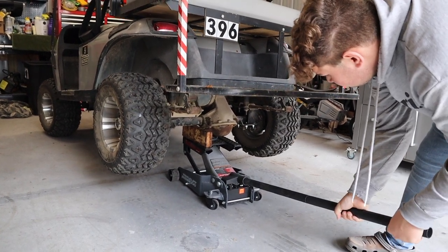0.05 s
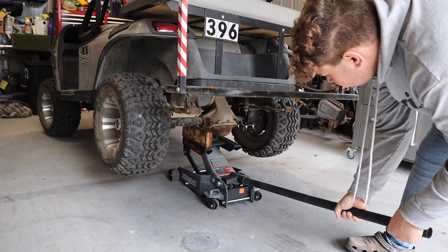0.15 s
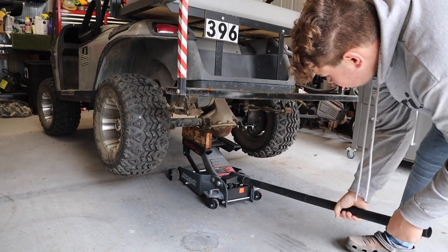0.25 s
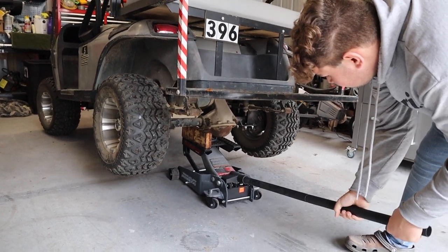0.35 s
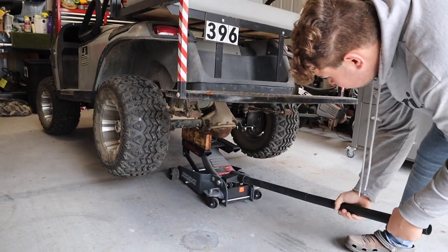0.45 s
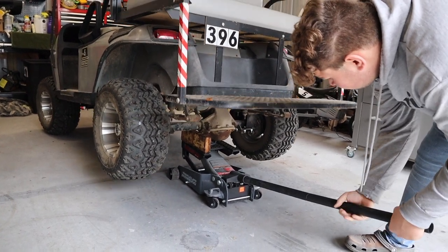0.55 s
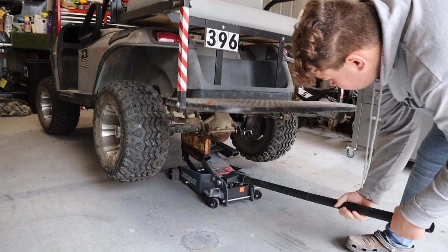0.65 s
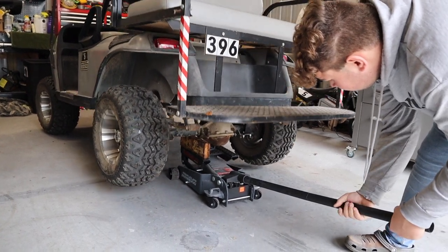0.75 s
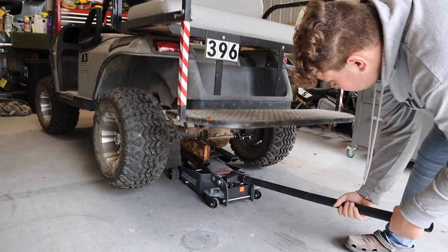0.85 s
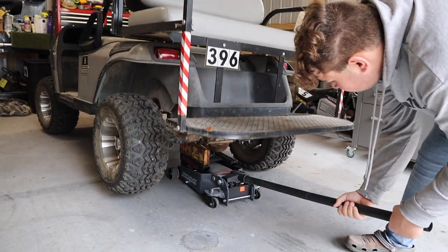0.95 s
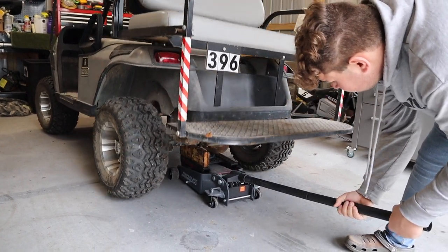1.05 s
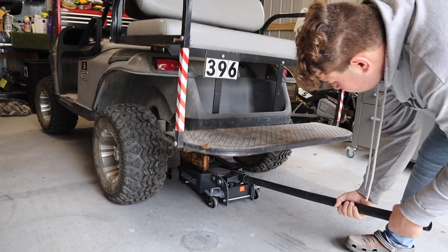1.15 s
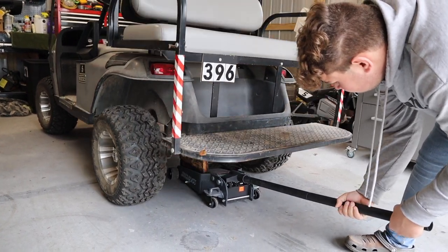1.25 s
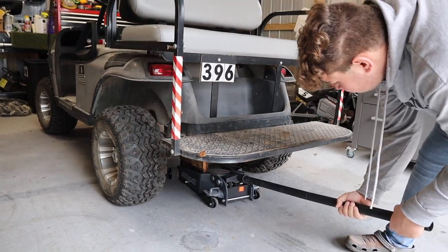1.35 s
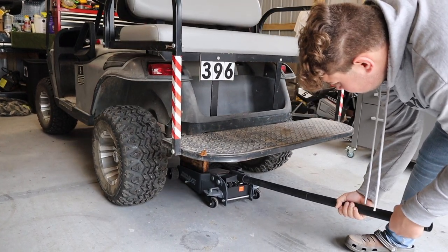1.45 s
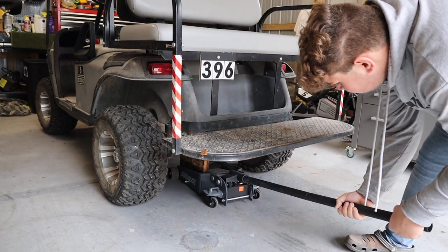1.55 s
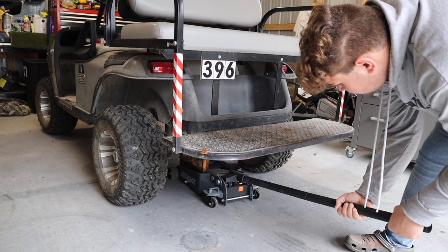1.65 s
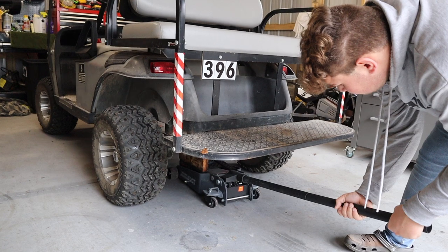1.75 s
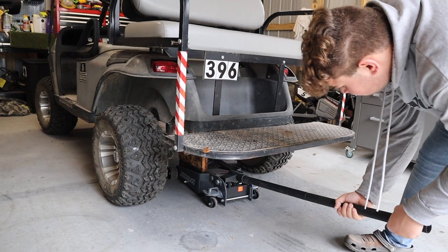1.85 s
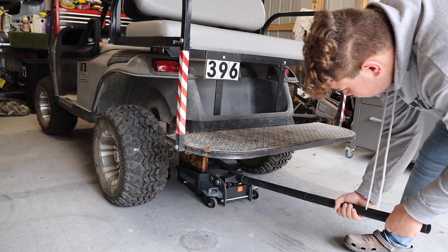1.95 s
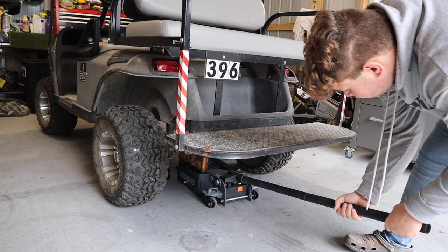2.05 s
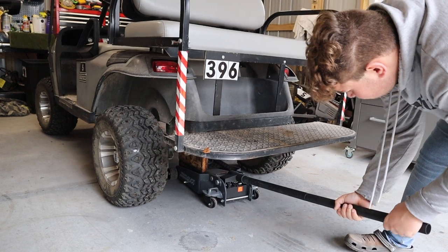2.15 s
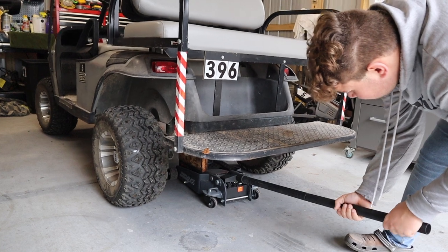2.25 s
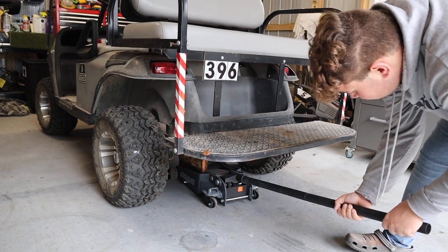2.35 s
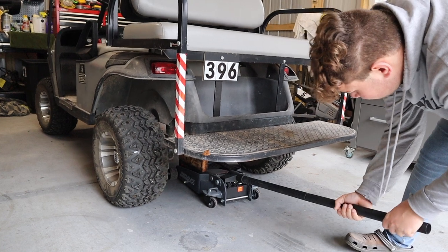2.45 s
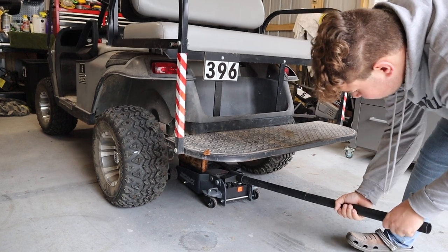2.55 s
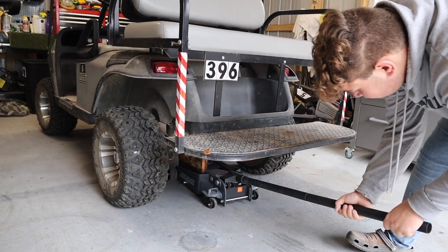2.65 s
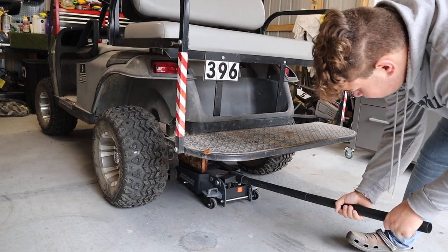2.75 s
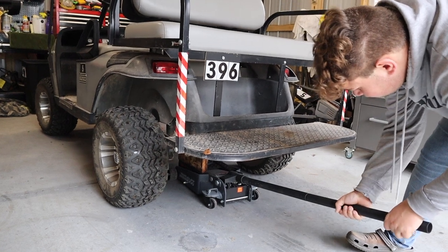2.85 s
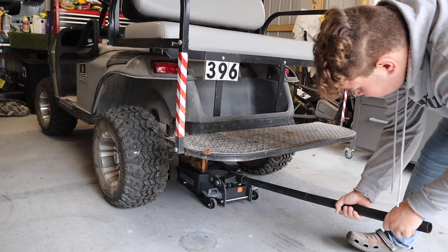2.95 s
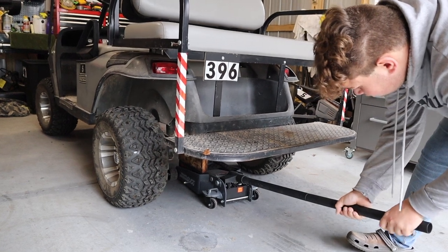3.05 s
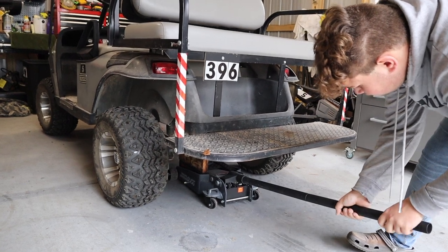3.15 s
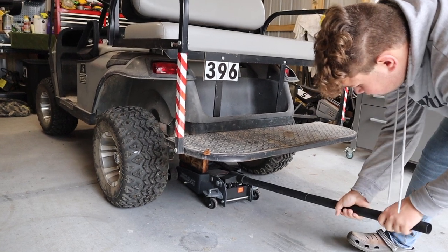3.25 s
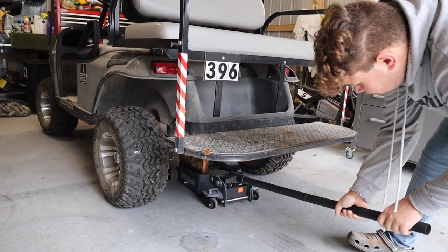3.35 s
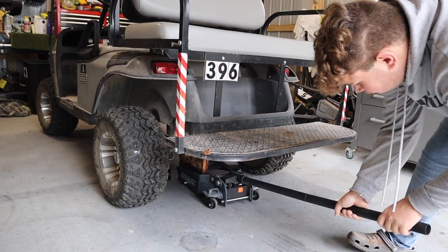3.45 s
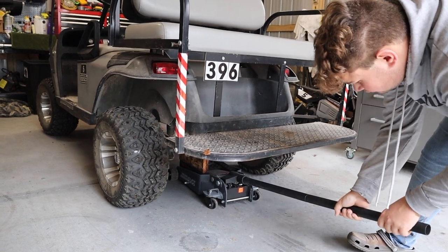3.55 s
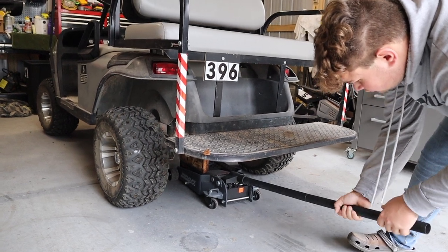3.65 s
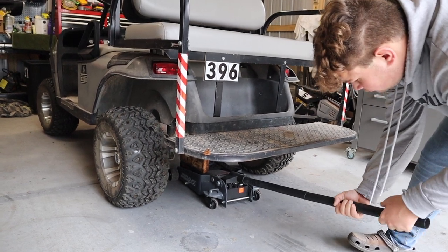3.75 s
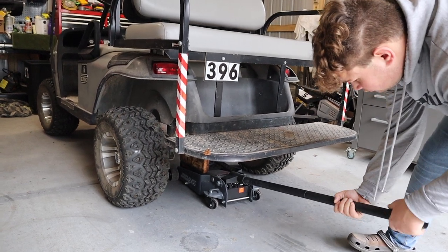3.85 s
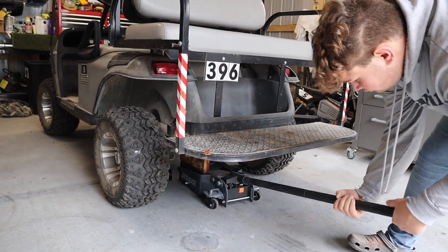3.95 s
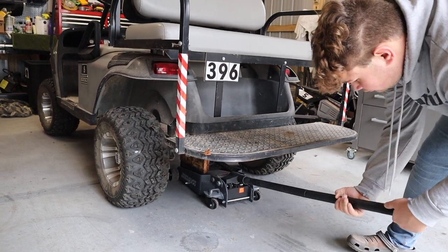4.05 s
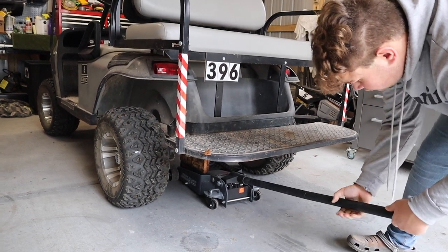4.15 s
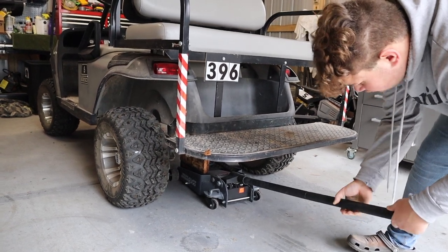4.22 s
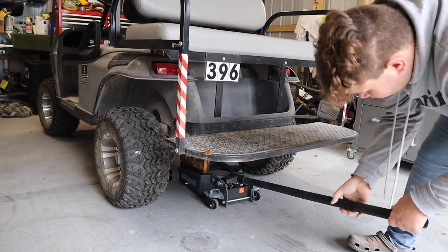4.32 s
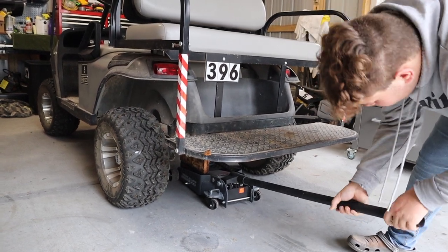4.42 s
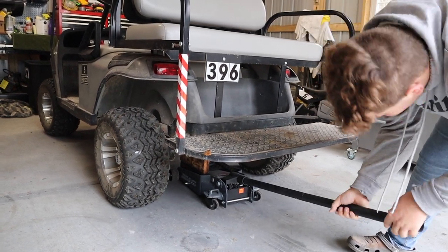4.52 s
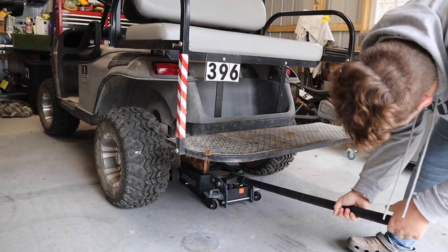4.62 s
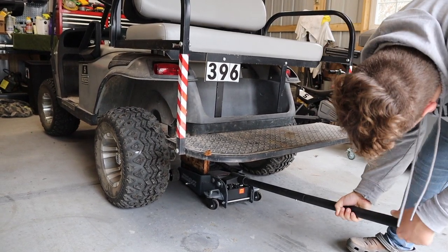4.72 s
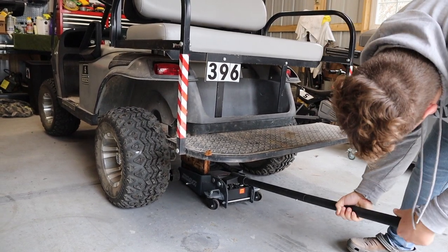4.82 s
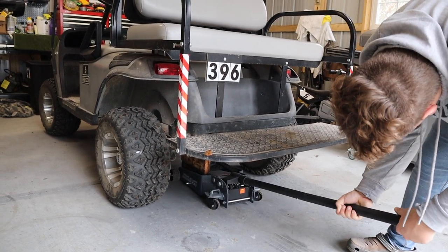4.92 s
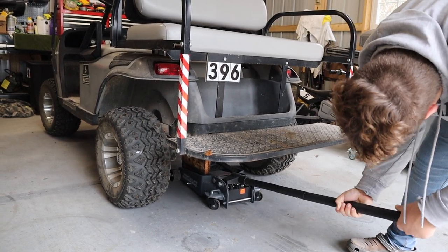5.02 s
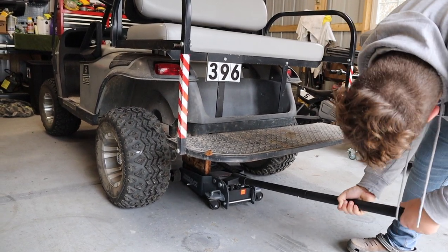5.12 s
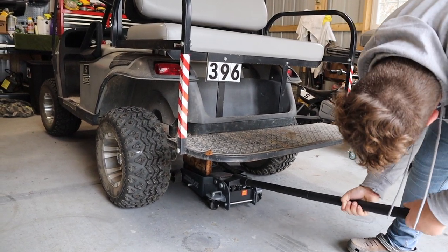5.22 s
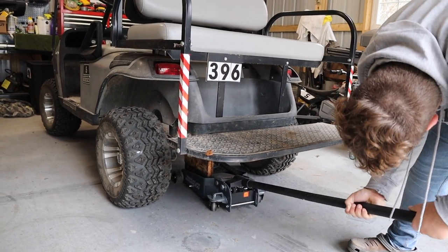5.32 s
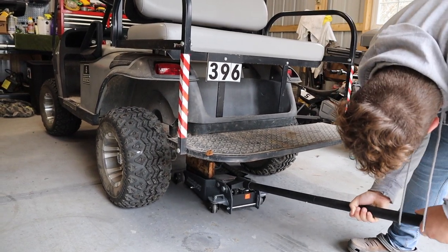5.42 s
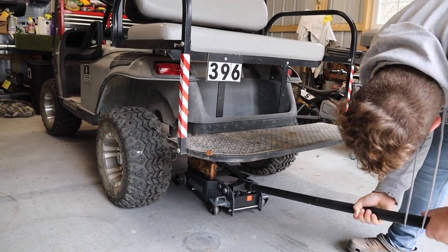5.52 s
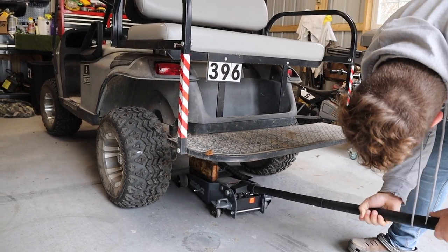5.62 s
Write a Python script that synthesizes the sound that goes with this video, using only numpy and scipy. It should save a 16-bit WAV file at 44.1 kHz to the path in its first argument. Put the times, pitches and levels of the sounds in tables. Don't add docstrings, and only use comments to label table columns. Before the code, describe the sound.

In an echoing garage, hydraulic hiss, tyre thuds and clanking sheet steel give way to loose handle ticks and small steel wheels grinding.

```python
import sys
import numpy as np
from scipy import signal
from scipy.fft import rfft, irfft
from scipy.io import wavfile
from scipy.ndimage import uniform_filter1d

SR = 44100
rng = np.random.default_rng(int(sys.argv[2]) if len(sys.argv) > 2 else 0)


def boost(x):
    u = np.asarray(x, float) / 20
    return 10 ** u


def digitize_waveform(pressure):
    field = np.atleast_2d(pressure).T
    bounded = np.clip(field, -1, 1)
    quanta = np.round(bounded * 32767).astype(np.int16)
    wavfile.write(sys.argv[1], SR, quanta)


N = 250488
T = np.arange(N) / SR

# (time [s], sway level [dB])
SWAY = [(0, -34), (.3, -46.5), (.98, -41.5), (1.07, -35), (1.77, -33), (2.06, -42), (2.28, -46.5),
        (2.53, -40.5), (3.02, -46.5), (3.64, -49.5), (3.92, -45.5), (4.43, -48.5), (4.6, -46), (5.01, -50),
        (5.52, -44.5), (5.68, -44.5)]
# (frequency [Hz], level [dB per Hz])
RUMBLE = [(15, -63), (25, 2), (38, 0.5), (81, 0.5), (135, -2.5), (170, -9.5), (220, -51)]
MURMUR = [(82, -60), (140, 0.5), (225, 1), (339, 0), (720, -9.5), (1140, -17.5), (1500, -24.5), (1950, -26),
          ]
HUSH = [(290, -23), (500, 3.5), (1370, -5), (1710, -10), (2030, -8.5), (4000, -14), (10200, -18.5),
        (11800, -20.5), (15100, -19), (15800, -26)]
MURMUR_DB, MURMUR_LAG_S, HUSH_DB = -45, 0.042, -52

# (time [s], flow level [dB])
FLOW = [
    (.45, -54),
    (.57, -44),
    (.64, -33),
    (.7, -32.5),
    (.86, -31.5),
    (1.004, -30.5),
    (1.158, -35.5),
    (1.232, -38.5),
    (1.258, -69),
    (1.36, -101),
]
# (frequency [Hz], level [dB per Hz])
JET = [(240, -37), (400, -14), (673, -10), (732, -9.5), (1180, -11), (1280, -9), (1540, -6), (1850, -2.5),
       (2820, -5), (3330, 0), (3840, -8.5), (6020, -7.5), (11500, -36), (15000, -68)]
# (frequency [Hz], width [Hz], gain [dB])
CYLINDER = [(659, 13, 28.5), (1310, 26, 14), (1920, 90, 23.5), (2217, 30, 27), (2620, 64, 12),
            (3020, 40, 22), (3270, 55, 12), (3310, 23, 25), (4090, 60, 20), (4390, 120, 19.5),
            (4640, 57, 4), (5200, 120, 15), ]
# (frequency [Hz], width [Hz], gain [dB])
SEEP = [(2620, 260, -7.5), (3150, 260, -6), (4100, 370, -15), (4500, 160, -14), (5400, 37, -29)]
# (time [s], level [dB], t60 [s])
SPURTS = [
    (1.304, -35.5, 0.096),
]
SEEP_DB, SEEP_GROWS_DB_PER_S, SEEP_ENDS_S = -68.5, 16, 0.53
OPENS_S, OPENING_S, SHUT_DB = 0.61, 0.1, -11
BRIGHT_DB, BRIGHT_FOLLOWS = -25, 0.16

# (time [s], level [dB], heft in the low band [dB], bite in the high band [dB], t60 [s])
CLANKS = [(.4995, -24.5, 3, -2.5, 0.16), (1.0545, -27.5, 5, -1, 0.49), (1.0694, -30, -3, -18, 0.25),
          (1.1273, -21, 5, -31, 0.14), (1.1494, -17, -4, -26, 0.085), (1.2194, -27, -2, -16, 0.15),
          (1.3234, -25.5, -6, -9, 0.21), (1.334, -25.5, 7.5, -16, 0.1), (1.39, -32.5, -9, 0.5, 0.47),
          (1.527, -31.5, -4, 0.5, .2), (2.495, -34.5, -6, -9, 0.59), (.499, -20.5, -11, -2, .04),
          (1.03, -35.5, 10.5, -17, 0.21), (1.538, -27.5, -4.5, -15, 1), (1.59, -23, 15, -7.5, 0.22),
          (1.599, -29.5, 12, -9, 0.22), (1.68, -33, 13, -13, 0.22), (1.6117, -26, 8, -5, 0.47),
          (1.8781, -29.5, -1, -12, 0.24), (1.976, -31, -4.5, -4.5, 0.2), (2.0378, -35.5, -3, -12, 0.4),
          (2.2394, -44.5, 1.5, -3, 0.38), (2.3326, -38, -10, -5, 0.096), (2.378, -34.5, -8, -13, 0.21),
          (2.39, -38, -14, -8.5, 0.4), (2.492, -22.5, 13, -15, 0.062), (2.505, -28.5, 8.5, -19, 0.35),
          (2.581, -34, 6, -10, 0.079), (2.632, -40, 9, -13, 0.32), (2.72, -44.5, 7.5, -23, 0.65),
          (2.955, -61, 22.5, -23, 0.49), (3.111, -45, -15, -20, .15), (3.168, -37.5, -22, -20, 0.16),
          (2.72, -47, 7, -17, 0.82), (3.2544, -46, 4, 4, 0.12), (3.2849, -33.5, 4, -24, 0.051)]
# (time [s], level [dB], heft [dB], bite [dB], t60 [s])
SLAMS = [
    (1.3598, -32, 12, -44, 0.19),
    (1.3714, -12.5, 5, 3.5, 0.044),
    (1.3788, -7.5, -4, -8.5, 0.068),
    (1.3947, -12, -11, -17, 0.024),
]
# (low edge [Hz], high edge [Hz])
CART_BANDS = [(1500, 2700), (330, 750), (750, 1500), (2900, 5300)]
STEP_BANDS = [(1600, 2800), (290, 750), (750, 1500), (3200, 6000)]
# (frequency [Hz], level [dB], t60 [s])
FRAME = [(330, -12, 0.62), (580, -12, 1), (652, -0.5, 0.072), (846.3, -27, 0.18), (1070, -17, 0.12),
         (1230, 2, 0.11), (1348, 9.5, 0.037), (2420, 12, 0.026)]
STEP = [(630, -28, 0.21), (935, 13, 0.07), (2060, 5, 0.07), (2760, -27, 0.095), (4480, 5, 0.45),
        (4730, -2, 0.093), (5200, 8, .04)]
# (time [s], level [dB], frequency [Hz], t60 [s])
MEMBERS = [(.503, -14.5, 2212, 0.026), (.503, -12.5, 1780, 0.027), (.503, -21, 1420, 0.038),
           (.528, -28, 444.5, 0.2), (1.056, -19, 625, 0.047), (1.062, -21, 358, 0.22),
           (1.204, -5.5, 414, 0.033), (1.225, -14, 311, 0.088), (1.361, -15.5, 666, 0.25),
           (1.362, -15, 809, 0.1), (1.377, -18.5, 1825, 0.17), (1.377, -2, 1965, 0.025),
           (1.378, -13, 4900, 0.056), (1.378, -27, 4300, 0.17), (1.378, -16.5, 5310, 0.051),
           (1.39, -27, 1580, 0.26), (1.591, -21, 1230, 0.12), (1.62, -33, 1260, 0.4),
           (1.604, -23, 512, 0.12), (1.6, -23, 312, 0.33), (1.6, -26, 673, 0.26), (1.6, -32, 1020, 0.67),
           (2.385, -39, 1740, 0.066), (2.494, -30, 540.5, 0.76), (2.494, -27, 1222, .7),
           (2.5, -22, 947, 0.22), (2.494, -29, 696, .4), (2.5, -37, 1570, 0.22), (2.581, -18.5, 543, 0.095),
           (2.581, -22, 973, 0.1), (2.96, -38, 548, 0.15), (2.496, -36, 2247, 0.45), (2.5, -35, 2090, .3),
           (2.387, -40.5, 2850, 0.14), (2.39, -39, 2680, 0.13), (3.113, -44, 2230, 0.1),
           (.53, -34.5, 332, 0.38), (.698, -29, 2186, 0.11), (.698, -24, 3280, 0.087),
           (1.36, -20, 500, 0.065), (1.385, -42, 2700, 0.27), (1.385, -25.5, 2296, 0.2),
           (1.485, -37, 815, 0.21), (1.59, -15, 560, 0.059), (1.672, -26, 521, 0.3),
           (1.035, -28.5, 249, 0.28), (1.38, -24, 5000, 0.03), (1.382, -37, 5730, 0.037)]

# (time [s], level [dB], frequency [Hz], t60 [s])
THUDS = [(.55, -24, 174, 0.036), (.85, -27.5, 113, 0.034), (1.022, -29.5, 94.5, 0.11),
         (1.045, -24.5, 105, 0.1), (1.075, -31, 91, 0.067), (1.125, -20.5, 91, 0.16),
         (1.138, -21, 147, 0.048), (1.203, -17, 166, 0.031), (1.226, -19, 112.5, 0.11),
         (1.37, -11, 99, 0.024), (1.595, -13, 128, 0.059), (1.9, -34, 101.6, 0.47), (2.265, -30, 225, 0.05),
         (2.5, -31.5, 117.3, 0.21), (4.364, -37.5, 85, .3), (4.388, -36, 84, 0.24),
         (5.44, -28.5, 184, 0.079)]
# (time [s], level [dB], frequency [Hz], t60 [s])
LANDINGS = [
    (1.1082, 12, 178.4, 0.025),
    (0.78, -22.5, 95, 0.042),
    (1.5, -15, 98, 0.092),
]
# (time [s], level [dB], frequency [Hz], length [s])
SQUEAKS = [
    (0.838, -34.5, 1310, 0.23),
    (1.312, -39.5, 5840, 0.015),
    (1.3, -57, 7800, 0.018),
    (1.301, -58, 9600, .015),
    (1.523, -59, 8700, 0.11),
    (4.55, -54, 7900, 0.021),
    (4.77, -46.5, 5920, 0.041),
    (4.79, -56, 5700, 0.03),
]

# (time [s], level [dB], heft [dB], bite [dB])
TICKS = [(1.613, -40, -10, 13), (2.7866, -52, 12, 7), (3.5593, -55, 8, 9), (3.6371, -46, 0, 1),
         (3.6886, -48, 10.5, -1), (3.719, -23.5, -8, -16), (3.7494, -39.5, 5, 4), (3.7633, -33, -7.5, -4),
         (3.7769, -37.5, 8, 2), (3.9125, -39.5, 1, -7), (3.9439, -36, 6, -16), (4.0602, -42, 8.5, -18),
         (4.12, -33.5, 0, -11), (4.1824, -31.5, 3.5, -9), (4.193, -44, 14, 4), (4.359, -31, -7.5, 2.5),
         (4.4253, -35, -1, 3.5), (4.4463, -31.5, -4, -6.5), (4.456, -48, 17, -3), (4.6867, -43.5, 7.5, -21)]
# (low edge [Hz], high edge [Hz])
HANDLE_BANDS = [(1700, 3000), (800, 1700), (6000, 13000), (3000, 6000)]
# (frequency [Hz], level [dB], t60 [s])
HANDLE = [(1315, -1.5, 0.097), (1576, -0.5, 0.019), (2110, -17, 0.023), (2170, -38, 0.035),
          (2480, -17, 0.087), (3340, -38, 0.16), (3560, -3, 0.069), (3900, 1.5, 0.17), (5300, -30, 0.14), ]
# (time [s], level [dB], frequency [Hz])
PINGS = [(1.883, -39, 3200), (2.496, -38, 3600), (3.72, -31, 3770), (4.359, -35, 4870), (4.12, -50, 7900),
         (1.979, -41, 4720), (3.256, -51, 4530), (3.286, -39, 1210), (3.719, -20.5, 2080),
         (3.72, -29, 1530), (3.719, -29, 2600), (3.748, -43, 3100), (3.912, -39, 1600), (3.912, -42, 2000),
         (4.06, -41, 1900), (3.763, -30, 1500), (3.763, -34, 2660), (3.764, -33, 2100), (3.776, -37, 1600),
         (3.776, -32, 3600), (4.426, -36, 3900), (4.69, -44, 1230), (3.943, -35.5, 1700),
         (4.121, -35, 1430), (4.19, -32, 1190), (4.7, -35, 1100), (4.185, -35, 1400), (3.955, -37, 1300),
         (4.36, -37, 3600), (4.425, -30.5, 2750), (5.06, -29, 1290)]
SHUFFLE_S, SHUFFLE_LENGTH_S, SHUFFLE_DB = 4.63, 0.3, -55.5

# (time [s], grit level [dB], fine dust over the grit [dB])
ROLL = [
    (4.95, -49, 21),
    (5.108, -36.5, 31.5),
    (5.21, -36.5, 28),
    (5.474, -25.5, 25),
    (5.68, -44, 40),
]
# (time [s], level [dB], heft [dB], bite [dB])
JOLTS = [(5.0584, -39, -1, -28), (5.1394, -43, 2, -30), (5.174, -45, 9, -12), (5.231, -47.5, 14, 3),
         (5.255, -48.5, 7, 6.5), (5.2864, -39, 5, -6), (5.3118, -44, 3, 1), (5.3314, -38, 8.5, 1),
         (5.3694, -36, -5, -3), (5.418, -41.5, 14.5, 7.5), (5.443, -29.5, 5.5, -4), (5.4749, -26, -18, -30),
         (5.4944, -45, -23, 14.5), (5.5254, -37, -2, 1), (5.5458, -24.5, -5.5, -17), (5.5548, -40, 16, -6),
         (5.5753, -36, 7, -26), (5.6024, -26, -27, -40), (5.6102, -45, 18.5, 0), (5.6421, -27, -2, -12.5),
         (5.6594, -38, 7, -12)]
# (time [s], level [dB], heft [dB], bite [dB])
CHATTER = [(5.1684, -45, -20, -16), (5.244, -41.5, -0.5, -18), (5.236, -57, 0, -6),
           (5.333, -35.5, 4.5, -17), (5.368, -36, 4, -13), (5.4152, -30, -1, -10), (5.4392, -30, 0, -12),
           (5.4712, -29.5, -3, 1), (5.4964, -42, 4, 17), (5.5242, -37.5, 10, -22), (5.542, -36, 5, -18),
           (5.6028, -33, -15, 8), (5.6424, -30.5, -2, -23)]
# (low edge [Hz], high edge [Hz])
CHASSIS_BANDS = [(1600, 3200), (900, 1600), (300, 900), (3200, 5500)]
AXLE_BANDS = [(10300, 12300), (6900, 8100), (14400, 15600), (8300, 9700)]
# (frequency [Hz], width [Hz], gain [dB])
WHEELS = [(724, 105, -4.5), (1290, 52, -4.5), (1740, 85, -19), (2450, 160, -13.5), (3480, 44, -20),
          (3750, 165, -4.5), (3970, 180, -4.5)]
AXLES = [(7430, 25, 7), (7670, 63, -8), (8360, 90, -13), (9100, 66, -13), (10700, 60, -14),
         (10750, 37, -11), (11700, 40, -9), (14900, 70, -2)]
# (time [s], level [dB], frequency [Hz], t60 [s])
RIMS = [(5.14, -39.5, 1260, .15), (5.177, -38, 1290, 0.16), (5.287, -29, 1480, 0.058),
        (5.312, -28, 1470, 0.066), (5.318, -31, 599, .15), (5.325, -34, 208, 0.2), (5.331, -34, 3830, .05),
        (5.36, -31, 1270, .15), (5.419, -20.5, 3790, 0.053), (5.42, -30, 3500, .08), (5.425, -28, 1290, .1),
        (5.441, -20, 707, 0.074), (5.443, -31.5, 578, 0.14), (5.458, -25, 1328, 0.078),
        (5.525, -34, 3930, 0.054), (5.547, -24.5, 2310, 0.061), (5.548, -31, 4950, 0.046),
        (5.552, -30, 1295, .12), (5.553, -44, 505, 0.076), (5.604, -35, 3150, .06),
        (5.617, -23, 1282, 0.11), (5.642, -28, 2010, 0.065), (5.645, -31, 750, 0.093)]
TICK_T60_S, JOLT_T60_S, CHATTER_T60_S, PING_T60_S = 0.081, 0.12, 0.072, 0.052
SPINS_S = 5.6

# (frequency [Hz], t60 [s])
GARAGE = [(100, 0.81), (500, 0.78), (1500, 0.83), (4000, 0.51), (9000, 0.36)]
SCENE_CHANGES_S, NARROW_HZ = 3.553, 11300


def evened(x):
    return x / np.sqrt(np.mean(x ** 2) + 1e-20)


def band(x, order, lo, hi):
    return signal.sosfilt(signal.butter(order, (lo, hi), "bandpass", fs=SR, output="sos"), x)


def curve(rows):
    s, *columns = np.transpose(rows)
    return [np.interp(T, s, c) for c in columns]


def during(rows, fade):
    fade_in = T - rows[0][0] + fade
    fade_out = rows[-1][0] + fade - T
    return np.clip(np.minimum(fade_in, fade_out) / fade, 0, 1)


def read(points, hz):
    f, value = np.transpose(points)
    return np.interp(np.log(hz + 1), np.log(f + 1), value)


def coloured(x, points):
    hz = np.fft.rfftfreq(len(x), 1 / SR)
    inside = (hz > .8 * points[0][0]) & (hz < 1.1 * points[-1][0])
    return irfft(rfft(x) * boost(read(points, hz)) * inside, len(x))


def patchy(x, patchy_db):
    z = signal.stft(x, nperseg=512)[2]
    patches = uniform_filter1d(rng.standard_normal(z.shape), size=3, axis=0)
    patches = uniform_filter1d(patches, size=12, axis=1)
    return signal.istft(z * boost(patchy_db * evened(patches)), nperseg=512)[1][:N]


def rings(x, peaks, wander):
    out, live = np.zeros(N), np.flatnonzero(x)
    span = slice(live[0], live[-1] + SR // 10)
    knots_s = np.arange(240) / 40
    for hz, width, db in peaks:
        drift, patch = (np.interp(T[span], knots_s, v) for v in rng.standard_normal((2, 240)))
        turn = np.exp(2j * np.pi * np.cumsum(hz * (1 + wander * drift)) / SR)
        r = np.exp(-np.pi * width / SR)
        ringing = turn * signal.lfilter([1 - r], [1, -r], x[span] / turn)
        out[span] += boost(db + 2.5 * patch) * 2 * ringing.real
    return out


def weighed(rows, follow_db, by_heft, by_bite, *t60):
    return [(s, db, db + heft, db + follow_db + by_heft * heft + by_bite * bite, db + bite, *own, *t60)
            for s, db, heft, bite, *own in rows]


def blows(rows, bands, rise):
    out = np.zeros(N)
    t = np.arange(SR // 3) / SR
    for s, *levels_db, t60 in rows:
        unevenness = boost(0.37 * rng.standard_normal(len(t) // 50).repeat(50))
        contacts = rng.standard_normal(len(t)) * unevenness
        contacts *= (1 - np.exp(-t / rise)) * boost(-60 * t / t60)
        part = out[round(s * SR):][:len(t)]
        for (lo, hi), db in zip(bands, levels_db):
            gain = boost(db - 7.5) * np.sqrt(SR / 2 / (hi - lo))
            part += gain * band(contacts, 4, lo, hi)[:len(part)]
    return out


def struck(x, modes, ring_db, longest, spread):
    t = np.arange(SR // 2) / SR
    body = np.zeros(len(t))
    for hz, db, t60 in modes:
        near = 1 + spread * rng.standard_normal((8, 1))
        cluster = np.sin(2 * np.pi * hz * near * t).sum(0)
        body += boost(db - 60 * t / min(t60, longest)) * cluster
    return x + boost(ring_db) * signal.fftconvolve(x, body / np.linalg.norm(body))[:N]


def swings(rows, sag, rise, rough):
    out, t = np.zeros(N), np.arange(SR // 3) / SR
    for s, db, hz, t60 in rows:
        blur = rough * np.cumsum(uniform_filter1d(rng.standard_normal(len(t)), size=24))
        turns = hz * (t + sag * (1 - np.exp(-t / 0.0028))) + blur
        swing = (1 - np.exp(-t / rise)) * boost(db - 60 * t / t60) * np.sin(2 * np.pi * turns)
        part = out[round(s * SR):][:len(t)]
        part += swing[:len(part)]
    return out


def air():
    a, b, c = rng.standard_normal((3, N))
    sway_db = curve(SWAY)[0]
    late_db = np.interp(T - MURMUR_LAG_S * np.minimum(T, 1), T, sway_db - sway_db.mean())
    rumble = boost(sway_db) * evened(coloured(a, RUMBLE))
    murmur = boost(MURMUR_DB + late_db) * evened(coloured(b, MURMUR))
    return rumble + murmur + boost(HUSH_DB) * evened(coloured(c, HUSH))


def valve():
    turbulence = evened(uniform_filter1d(rng.standard_normal(N), 300))
    jet = rng.standard_normal(N) * boost(0.43 * turbulence)
    flow_db = curve(FLOW)[0]
    opened, cracked = during(FLOW, fade=0.043), T < SEEP_ENDS_S
    ringing = .45 * evened(rings(jet * opened, CYLINDER, wander=.004))
    direct = 2.0 * evened(patchy(coloured(jet, JET), 1.5))
    hiss = boost(-1.5) * (direct + ringing) / 2
    upper_band = signal.butter(2, (2900, 4200), "bandpass", fs=SR, output="sos")
    upper = signal.sosfiltfilt(upper_band, hiss)
    still_shut = np.clip(1 - (T - OPENS_S) / OPENING_S, 0, 1)
    hiss = hiss + (boost(SHUT_DB * still_shut) - 1) * upper
    treble = signal.sosfilt(signal.butter(2, 4000, "highpass", fs=SR, output="sos"), hiss)
    brightness = boost(BRIGHT_DB + BRIGHT_FOLLOWS * (flow_db + 23))
    full = (hiss + (brightness - 1) * treble) * boost(flow_db) * opened
    spurts = treble * sum((T > s) * boost(db - 60 * abs(T - s) / t60) for s, db, t60 in SPURTS)
    seep = evened(rings(jet * cracked, SEEP, wander=0.0098)) * cracked
    seep = seep * boost(SEEP_DB + SEEP_GROWS_DB_PER_S * T * cracked)
    return full + spurts + seep


def cart():
    clanks = blows(weighed(CLANKS, 0.1, .7, .02), CART_BANDS, rise=.0015)
    frame = struck(clanks, FRAME, ring_db=-21, longest=.4, spread=.07)
    slams = blows(weighed(SLAMS, -26, 1.06, -.79), STEP_BANDS, rise=.003)
    step = struck(slams, STEP, ring_db=-25, longest=.08, spread=.05)
    return frame + step


def members():
    return swings(MEMBERS, sag=0, rise=.002, rough=.006)


def tyres():
    return boost(4.0) * swings(THUDS, sag=0.0025, rise=0.0012, rough=0.00042) + landings()


def landings():
    return swings(LANDINGS, sag=0, rise=.007, rough=0)


def squeaks():
    out = np.zeros(N)
    waver = evened(uniform_filter1d(rng.standard_normal(N), 150))
    for s, db, hz, length in SQUEAKS:
        u = np.clip((T - s) / length, 0, 1)
        arch = np.sqrt(np.sin(np.pi * u) + 1e-12) * (u > 0) * (u < 1)
        out += boost(db) * arch * np.sin(2 * np.pi * hz * T + 0.38 * waver - 12.5 * u ** 2)
    return out


def handle():
    knocks = blows(weighed(TICKS, -11, .02, 0.82, TICK_T60_S), HANDLE_BANDS, rise=0.000084)
    return struck(knocks, HANDLE, ring_db=-14.5, longest=0.16, spread=0.012)


def pings():
    return swings([(*row, PING_T60_S) for row in PINGS], sag=0, rise=0.0003, rough=0.007)


def shuffle():
    rustle = band(rng.standard_normal(N), 2, 1200, 5000)
    swell = np.exp(-((T - SHUFFLE_S) / SHUFFLE_LENGTH_S) ** 2)
    return boost(SHUFFLE_DB) * swell * evened(patchy(rustle, 3))


def wheels():
    grit_db, dust_db = curve(ROLL)
    grain_db = 0.68 * np.minimum(rng.exponential(1, N), 4)
    grit = rng.standard_normal(N) * boost(grain_db) * (rng.random(N) < 8000 / SR)
    rolling = boost(grit_db) * during(ROLL, fade=0.12)
    drive = boost(-14.0) * evened(band(grit, 4, 500, 2000)) * rolling
    drive += blows(weighed(JOLTS, -0.87, 0.89, 0.022, JOLT_T60_S), CHASSIS_BANDS, rise=0.0013)
    chatter = blows(weighed(CHATTER, -13, .02, 0.38, CHATTER_T60_S), AXLE_BANDS, rise=0.00067)
    level = [(hz, 0.96 * width, db + 3.8 * np.log2(hz / 1300)) for hz, width, db in WHEELS]
    ringing = boost(9.0) * rings(drive, level, wander=0.013)
    dust = boost(dust_db - 48.5) * evened(band(grit, 2, 3000, 10000)) * rolling
    spinning = np.clip((T - SPINS_S) / .1, 0, 1)
    axles = boost(10) * rings(chatter + dust * spinning, AXLES, wander=.004)
    return boost(-4.0) * drive + boost(-3) * chatter + ringing + axles + dust


def rims():
    return swings(RIMS, sag=0, rise=.002, rough=.008)


def garage(x):
    out = np.zeros(N)
    for k in range(3):
        taps = np.zeros(SR)
        at = np.arange(200, SR - 20, 20)
        taps[at + rng.integers(0, 20, len(at))] = rng.choice([-1., 1.], len(at))
        hz, t, z = signal.stft(taps, SR, nperseg=256)
        decay = boost(-60 * t / read(GARAGE, hz)[:, None])
        tail = signal.istft(z * decay, SR, nperseg=256)[1]
        turn = np.sqrt(2 / 3) * np.cos(np.pi * (3.1 * T + k / 3))
        out += signal.fftconvolve(x * turn, tail / np.linalg.norm(tail))[:N]
    return out


def scene():
    far, low, jet = cart(), tyres(), valve()
    near = handle() + wheels() + shuffle()
    frame_notes, small_notes = members(), pings() + rims() + squeaks()
    notes = boost(-11) * frame_notes + boost(-17) * small_notes
    wet = garage(boost(-5.5) * far + boost(-8) * low + boost(-6.5) * jet + boost(-9) * near + notes)
    return (far + low + jet + near + frame_notes + small_notes + wet + air())[None]


def top_cut(x):
    return signal.sosfilt(signal.butter(12, 15960, fs=SR, output="sos"), x)


def record(dry):
    lowpass = signal.firwin(401, NARROW_HZ, window=("kaiser", 9), fs=SR)
    narrow = signal.oaconvolve(dry, lowpass[None], "same")
    mix = np.where(T < SCENE_CHANGES_S, narrow, dry)
    return top_cut(mix)


dry = scene()
out = record(dry)
digitize_waveform(out)
```